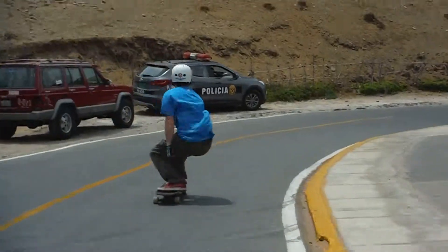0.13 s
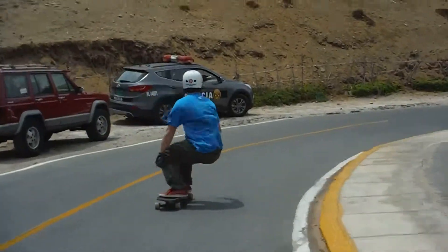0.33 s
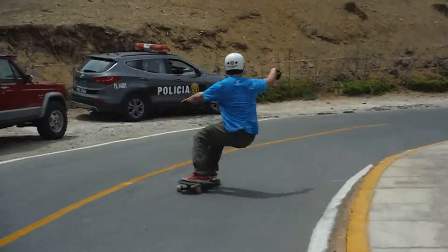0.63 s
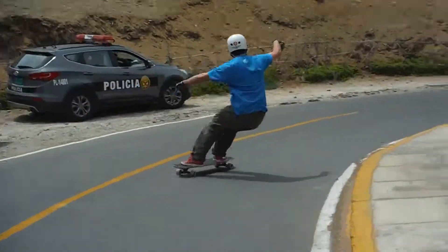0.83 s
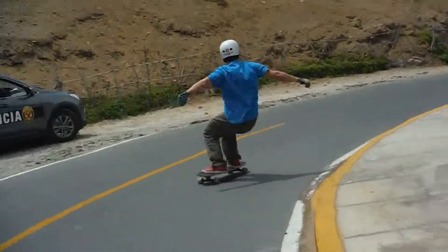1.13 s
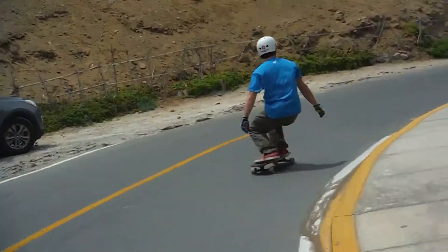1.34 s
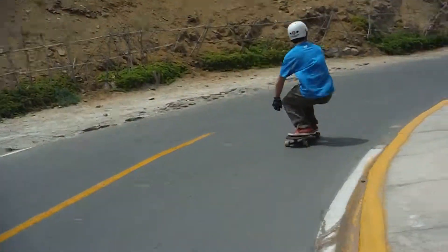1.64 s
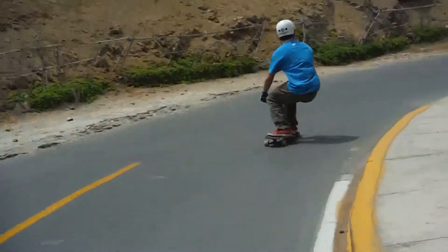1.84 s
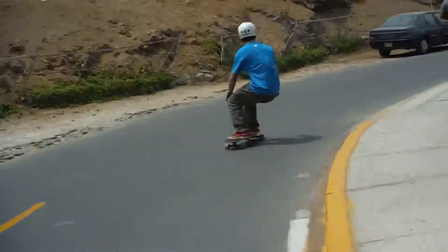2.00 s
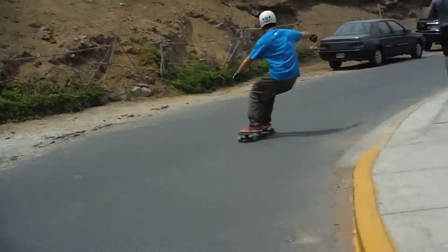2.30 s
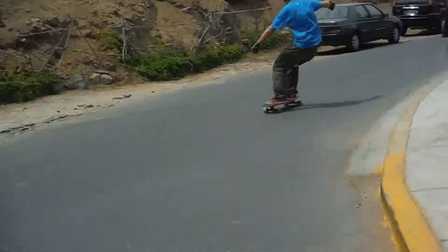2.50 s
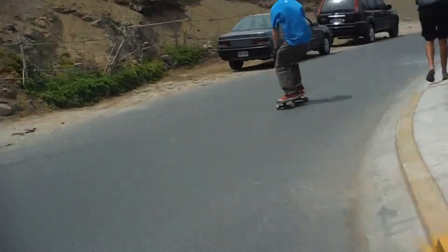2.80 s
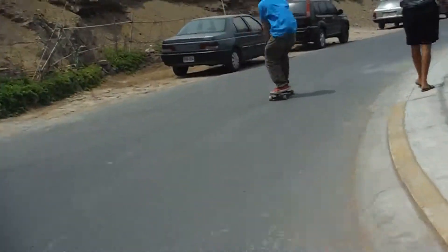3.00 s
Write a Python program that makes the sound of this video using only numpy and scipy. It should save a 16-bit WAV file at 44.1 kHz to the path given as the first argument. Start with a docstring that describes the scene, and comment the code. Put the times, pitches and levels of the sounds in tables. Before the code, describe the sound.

A skateboard rolls down an asphalt road just ahead of a moving, wind-buffeted microphone. After the strongest gusts crack, the wheels scrape sideways, then rasp and ring through a longer slide, ending in a hollow skid.

```python
"""Wind rumbles on the microphone first, over the steady hiss of skateboard wheels on asphalt.
Outdoors on a road, one moving microphone follows close behind a skateboarder carving downhill.
In each slide the wheels stick and slip: they scrape, rasp, sing near 6 kHz and shake the deck.
Between slides they whistle briefly; at the end the board skids on with a hollower hiss.
Eddies thump and crack at the microphone, and the strongest overload its input."""
import sys
import numpy as np
from scipy import signal
from scipy.fft import rfft, irfft
from scipy.io import wavfile

SR = 44100
rng = np.random.default_rng(int(sys.argv[2]) if len(sys.argv) > 2 else 0)


def wrap_up_sound(samples):
    """Save the sound to the file named by the first command line argument, as 16-bit audio."""
    columns = np.atleast_2d(samples).T
    # keep every value between -1 and 1, then stretch to whole-number steps
    tamed = np.clip(columns, -1, 1)
    steps = np.round(tamed * 32767).astype(np.int16)
    wavfile.write(sys.argv[1], SR, steps)


N = 138915
T = np.arange(N) / SR
HZ = np.fft.rfftfreq(N, 1 / SR)
CHATTER_HZ = 163  # the wheels' stick-slip flutter reaches up to about this rate


def amp(db):
    """Decibels to gain."""
    return 10 ** (np.asarray(db) / 20)


def unit(x):
    """Scales to an rms of one."""
    return x / np.sqrt(np.mean(x ** 2) + 1e-20)


def curve(points):
    """Joins (time_s, value) points by straight lines."""
    return np.interp(T, *np.transpose(points))


def colour(x, spectrum):
    """Filters by a (frequency_hz, relative_db) outline and scales to an rms of one."""
    hz, db = np.transpose(spectrum)
    gain = amp(np.interp(np.log(HZ + 1), np.log(hz), db))
    return unit(irfft(rfft(x) * gain, N))


def wander(rate_hz):
    """Random motion up to a given rate."""
    return unit(irfft(rfft(rng.standard_normal(N)) / (1 + (HZ / rate_hz) ** 4), N))


def flutter(rate_hz, depth_db):
    """A randomly fluttering gain of mean power one."""
    return unit(amp(depth_db * wander(rate_hz)))


def saturate(x, ceiling, knee):
    """Rounds off peaks below a ceiling; a higher knee makes a harder corner."""
    return x / (1 + abs(x / ceiling) ** knee) ** (1 / knee)


# Wind rumble, right on the microphone: frequency_hz, relative_db
WIND_SPECTRUM = [(10, -2), (25, -0.5), (43, 2.5), (65, -3.5), (110, -4), (180, -11.5), (300, -18),
                 (600, -42), (1500, -52), (4000, -79)]
# Its gusts and lulls: time_s, level_db
WIND_LEVEL = [(0, -15.5), (.18, -18.5), (.27, -23), (.34, -13.5), (.53, -14.5), (.68, -11.5), (.86, -16.5),
              (1.05, -31), (1.27, -18.5), (1.42, -28.5), (1.7, -23.5), (1.95, -15.5), (2.1, -29.5),
              (2.3, -18.5), (2.55, -29), (2.78, -21), (3.03, -27), (3.15, -14)]


def wind():
    """Air rushing past the microphone breaks into lumpy low turbulence."""
    turbulence = rng.standard_normal(N) * flutter(rate_hz=25, depth_db=2)
    return colour(turbulence, WIND_SPECTRUM) * amp(curve(WIND_LEVEL))


def grit(slips_per_s=4000, spread_db=3.5, slip_share=0.42):
    """Tiny slips of urethane over stone chips, on a bed of finer friction noise."""
    size = amp(spread_db * np.minimum(rng.exponential(1, N), 5))
    slips = size * rng.choice([-1, 1], N) * (rng.random(N) < slips_per_s / SR)
    return np.sqrt(slip_share) * unit(slips) + np.sqrt(1 - slip_share) * rng.standard_normal(N)


# Wheels on asphalt, heard from close behind: frequency_hz, relative_db
ROLL_SPECTRUM = [(100, 10), (400, 2.5), (900, -2.5), (1600, -4), (2600, -9.5), (4000, -11.5), (5800, -8.5),
                 (7200, -11.5), (9000, -15), (12000, -24.5), (15400, -33)]
# Their nearly even hiss: time_s, level_db
ROLL_LEVEL = [(0, -32), (.7, -30), (1.2, -31.5), (1.7, -34), (2.2, -31.5), (3.15, -33.5)]


def rolling():
    """The wheels hiss as they run over the grain of the road."""
    friction = grit() * flutter(CHATTER_HZ, depth_db=1)
    return colour(friction, ROLL_SPECTRUM) * amp(curve(ROLL_LEVEL))


# Large eddies hitting the microphone: centre_s, length_s, level_db, corner_hz
BUFFETS = [(0.024, 0.026, -14.5, 68), (0.235, 0.025, -11.5, 255), (0.373, 0.052, -15.5, 226),
           (0.465, 0.08, -15, 150), (0.626, 0.011, -6.5, 64.5), (0.747, 0.019, -3.5, 130),
           (.777, .035, -8, 268), (.825, 0.037, -9.5, 170), (1.968, 0.031, -10.5, 45),
           (2.293, 0.049, -19, 236), (2.427, 0.024, -12.5, 40)]


def buffets(low_hz=22, top_hz=2060, slope=2.16):
    """Each large eddy is a short low swirl of pressure."""
    out = np.zeros(N)
    band = HZ ** 2 / (HZ ** 2 + low_hz ** 2) / (1 + (HZ / top_hz) ** 4)
    for centre_s, length_s, level_db, corner_hz in BUFFETS:
        rolloff = (1 + (HZ / corner_hz) ** 2) ** (slope / 2)
        swirl = irfft(rfft(rng.standard_normal(N)) * band / rolloff, N)
        swell = np.exp(-(2 * (T - centre_s) / length_s) ** 2)
        gain = amp(level_db) * np.sqrt(length_s * SR / N)  # level over the eddy's own length
        out += gain * unit(swirl * swell)
    return out


# Small fast eddies at the microphone port: centre_s, peak_db, pitch_hz
CRACKS = [(.231, -13, 395), (.358, -11.5, 480), (.417, -9, 383), (.497, -12.5, 470), (.594, -10.5, 467),
          (.613, -7, 234), (.688, -5.5, 328), (0.7, -5, 794), (.707, -4, 510), (.748, -5, 490),
          (0.772, 2, 670), (0.792, -7, 615), (0.815, -6, 360), (.848, -5.5, 470), (.898, -10.5, 490),
          (1.26, -12, 192)]


def cracks(wake_db=-13, wake_decay_s=0.0046):
    """A small eddy crosses the port: a sharp push and pull, then a turbulent wake."""
    out = np.zeros(N)
    for centre_s, peak_db, pitch_hz in CRACKS:
        phase = 2 * np.pi * pitch_hz * (T - centre_s)
        jolt = rng.choice([-1, 1]) * phase * np.exp((1 - phase ** 2) / 2)
        onset = np.tanh(np.maximum(phase, 0))
        wake = wander(pitch_hz * 2) * onset * np.exp(-abs(T - centre_s) / wake_decay_s)
        out += amp(peak_db) * (jolt + amp(wake_db) * wake)
    return out


def surge(centre_s=0.587, length_s=0.011):
    """One push of air that pins the microphone's input for an instant."""
    return np.exp(-(2 * (T - centre_s) / length_s) ** 2)


# Wheels scraping sideways, just ahead of the microphone: frequency_hz, relative_db
SCRAPE_SPECTRUM = [(300, -25), (1250, -8.5), (1800, 0), (2800, 2.5), (4200, 0.5), (5600, 2.5), (7500, -2.5),
                   (9200, -5.5), (12500, -9.5), (14000, -18), (15700, -23)]
# The scrape swells with each slide: time_s, relative_db
SCRAPE_LEVEL = [(0, -44), (.68, -38), (.78, -29), (.86, -24), (.94, -22.5), (1.02, -25.5), (1.1, -27.5),
                (1.14, -34.5), (1.4, -44), (1.865, -38), (1.9, -25), (1.98, -26.5), (2.1, -29),
                (2.28, -32.5), (2.35, -26.5), (2.43, -22), (2.5, -23.5), (2.62, -33.5), (2.8, -36.5),
                (3.054, -38), (3.062, -36), (3.15, -24)]
# Shrill rasp of the hardest slides: frequency_hz, relative_db
RASP_SPECTRUM = [(2500, -27), (4500, -9), (5500, -5.5), (6300, 1.5), (7400, 1), (8100, -17), (10000, -59)]
# Its flare-ups: time_s, level_db
RASP_LEVEL = [(0, -43), (.8, -55), (.95, -30), (1.1, -34.5), (1.17, -43.5), (1.8, -42.5), (1.93, -24),
              (2.02, -23.5), (2.14, -38), (2.3, -35), (2.36, -29), (2.42, -21.5), (2.53, -34), (2.63, -38),
              (3.05, -38), (3.065, -26), (3.15, -35)]
# Low judder of deck and trucks: frequency_hz, relative_db
JUDDER_SPECTRUM = [(60, 3), (160, 10), (320, -1.5), (560, 1), (900, -3), (1400, -8.5), (2200, -23),
                   (4000, -42)]
# How hard they shake: time_s, level_db
JUDDER_LEVEL = [(0, -49), (.85, -31), (1.1, -37.5), (1.4, -50), (1.855, -34.5), (1.882, -22.5), (2.1, -30),
                (2.32, -28), (2.45, -25), (2.68, -36.5), (2.82, -30), (3.05, -36), (3.065, -21.5),
                (3.15, -23.5)]


def sliding(scrape_trim_db=-2.5):
    """One stick-slip chatter drives the scrape, the shrill rasp and the judder of the deck."""
    chatter = flutter(CHATTER_HZ, depth_db=1.58)
    scrape = colour(grit() * chatter, SCRAPE_SPECTRUM) * amp(curve(SCRAPE_LEVEL) + scrape_trim_db)
    rasp = colour(grit() * chatter, RASP_SPECTRUM) * amp(curve(RASP_LEVEL))
    judder = colour(grit() * chatter, JUDDER_SPECTRUM) * amp(curve(JUDDER_LEVEL))
    return scrape + rasp + judder


def resonate(x, hz, width_hz):
    """A steep resonance that follows a pitch curve."""
    carrier = np.exp(2j * np.pi * np.cumsum(hz) / SR)
    pole = np.exp(-np.pi * width_hz / SR)
    baseband = signal.lfilter([1], np.convolve([1, -pole], [1, -pole]), x / carrier)
    return unit((carrier * baseband).real)


# The wheels' resonances before drift, main one first: pitch_hz, width_hz, relative_db
WHEEL_MODES = [(5590, 360, 0), (5980, 620, -1.5), (6480, 570, -10), (4680, 1700, -15.5), (8250, 310, -14.5)]
# Drift of the main resonance: time_s, pitch_hz
SING_PITCH = [(0, 5600), (1.3, 5515), (1.8, 5640), (2.05, 5680), (2.28, 5640), (2.5, 5690), (2.8, 5580),
              (3.15, 5270)]
# The ring rising into the first slide: time_s, relative_db
SING_CARVE = [(0.0, -55), (0.022, -51), (0.658, -39.5), (0.93, -28.5), (1.05, -42)]
# A chirp as the wheels catch, then a whistle: time_s, relative_db
SING_GRIP = [(1.07, -38), (1.098, -24), (1.135, -39), (1.2, -38), (1.25, -29), (1.41, -33), (1.55, -37.5),
             (1.79, -45)]
# The ring through the long slide: time_s, relative_db
SING_SLIDE = [(1.82, -46), (2.016, -23), (2.112, -26.5), (2.134, -21), (2.196, -29), (2.43, -18.5),
              (2.438, -22), (2.582, -21), (2.608, -29), (2.764, -24.5), (3.042, -40), (3.056, -29.5),
              (3.15, -24.5)]


def singing(waver_hz=30.5, whistle_db=-3.5, grip_ring_db=-2, trim_db=-3.5):
    """Friction rings the wheels: a thin whistle at the edge of grip, broader in a slide."""
    friction = grit() * flutter(CHATTER_HZ, depth_db=2) * flutter(waver_hz, depth_db=0.8)
    main_hz = WHEEL_MODES[0][0]
    drift = curve(SING_PITCH) / main_hz * (1 + 0.005 * wander(waver_hz))
    ring = np.zeros(N)
    for pitch_hz, width_hz, relative_db in WHEEL_MODES:
        drive = friction * rng.choice([-1, 1], N)  # random signs keep the modes independent
        ring += amp(relative_db) * resonate(drive, pitch_hz * drift, width_hz)
    thin_ring = whistle(main_hz * drift) * amp(whistle_db) + ring * amp(grip_ring_db)
    gripping = (T > 1.3) & (T < 1.5)  # the wheels hold the road between two slides
    level_db = curve([*SING_CARVE, *SING_GRIP, *SING_SLIDE]) + trim_db
    return np.where(gripping, thin_ring, ring) * amp(level_db)


def whistle(pitch_hz):
    """The thin, unsteady squeal of a wheel that still grips."""
    jitter = 1 + 0.009 * wander(CHATTER_HZ)
    phase = 2 * np.pi * np.cumsum(pitch_hz * jitter) / SR
    return unit(np.sin(phase) * flutter(CHATTER_HZ, depth_db=2.5))


# Hollow skid of the run-out down the road: frequency_hz, relative_db
SKID_SPECTRUM = [(2010, -22), (2680, -7.5), (3400, -13), (4000, -15.5), (5030, 1.5), (6000, -3),
                 (7300, -18), (7950, -26), (8400, -7), (7950, -19), (8260, -7.5), (9100, -22),
                 (10400, -10.5), (11300, -17), (12500, -21), (13200, -16), (14000, -28), (15500, -34)]
# Its slow rise and last bite: time_s, level_db
SKID_LEVEL = [(0, -74), (1.9, -44), (2.6, -36.5), (2.9, -33.5), (3.054, -35), (3.06, -23), (3.15, -36)]


def skidding():
    """The board skids on with a hollower hiss and bites again at the end."""
    friction = grit() * flutter(CHATTER_HZ, depth_db=1.58)
    return colour(friction, SKID_SPECTRUM) * amp(curve(SKID_LEVEL))


def scene():
    """Wind and board at one close microphone; airspeed bounds the pressure of the swirls."""
    swirls = saturate(wind() + buffets(), ceiling=0.62, knee=4)
    air = swirls + cracks() + surge()
    board = rolling() + sliding() + singing() + skidding()
    return (air + board)[None]


def record(dry, cutoff_hz=15750):
    """The microphone's input overloads on the strongest eddies; a low-pass cuts the top treble."""
    clipped = saturate(dry, ceiling=0.65, knee=10)
    lowpass = signal.firwin(511, cutoff_hz, window=("kaiser", 9), fs=SR)
    return signal.oaconvolve(clipped, lowpass[None], "same")


dry = scene()
out = record(dry)
wrap_up_sound(out)
```